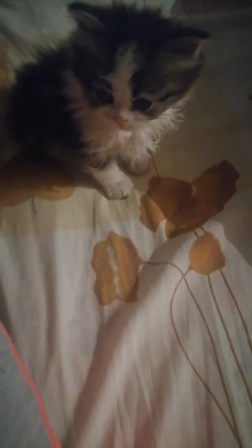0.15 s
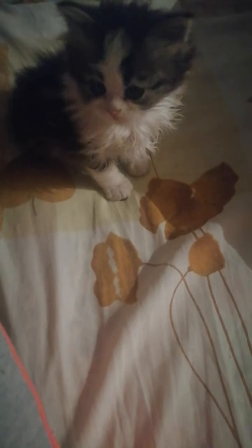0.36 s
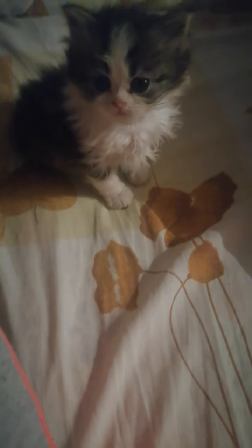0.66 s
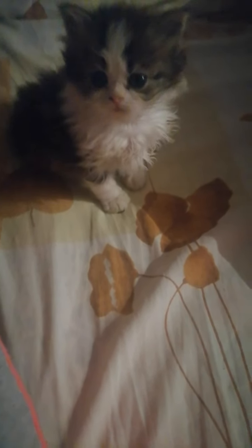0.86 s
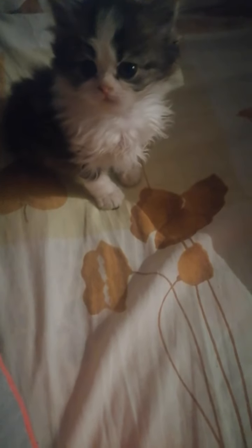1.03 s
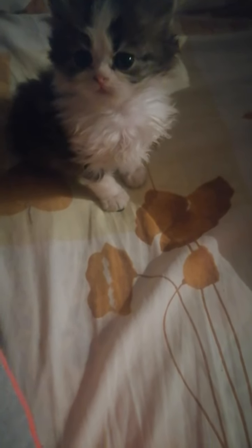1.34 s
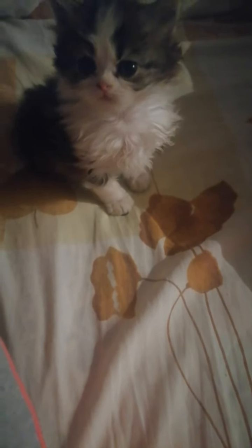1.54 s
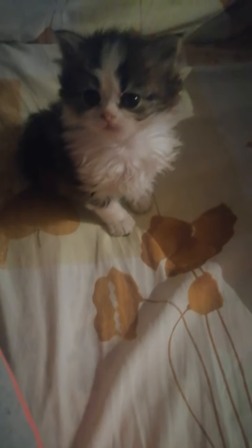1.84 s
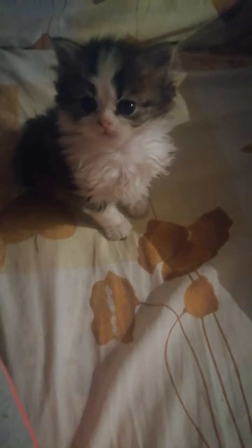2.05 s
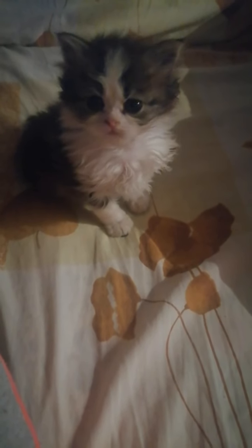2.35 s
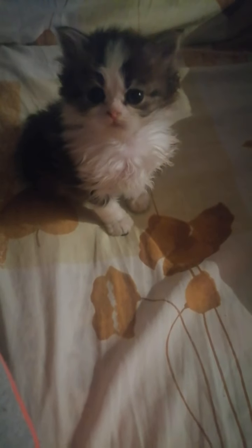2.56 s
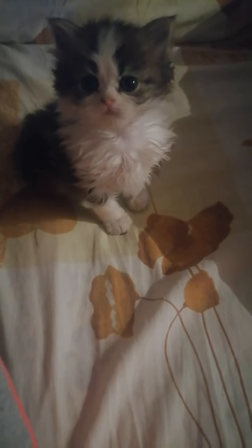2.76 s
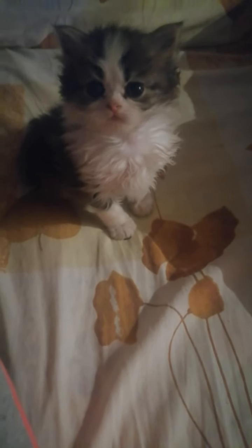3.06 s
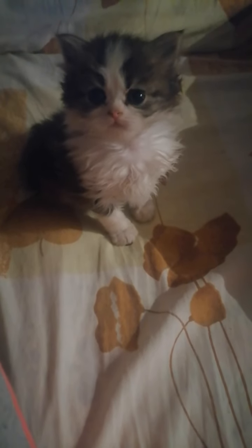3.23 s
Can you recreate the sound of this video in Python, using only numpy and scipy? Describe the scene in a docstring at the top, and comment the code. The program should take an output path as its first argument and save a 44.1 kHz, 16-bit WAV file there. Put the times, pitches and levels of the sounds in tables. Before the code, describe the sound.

A kitten meows twice, close to the microphone in a quiet room. After a tiny click at 0.2 seconds, the first high, steady-pitched meow runs from about 0.5 to 0.9 seconds, fading as the mouth closes. The second, slightly brighter and raspier, lasts from 2.0 to 2.6 seconds and lifts at its end. Faint rumble and hum lie underneath, with soft handling bumps near 1.1 and 3 seconds.

```python
"""A kitten meows twice, close by, on a bed in a quiet room.
Each meow is a clean tone from the vocal folds, rich in harmonics (multiples of its pitch). It starts
through the nose, the mouth opens, and its resonance slides down across the harmonics as it closes.
Breath adds a little rasp. The room rings briefly at the meow's pitch after the second meow. Around it
lie small ticks, rustling bedding, bumps of a hand on a phone, faint far-off tones, hum and rumble."""
import sys
import numpy as np
from scipy import signal
from scipy.fft import rfft, irfft
from scipy.io import wavfile
from scipy.ndimage import uniform_filter1d

SR = 44100
rng = np.random.default_rng(int(sys.argv[2]) if len(sys.argv) > 2 else 0)


def to_wav(s):
    """Save 16-bit WAV."""
    ch = np.atleast_2d(s).T  # columns
    pcm = np.round(np.clip(ch, -1, 1) * 32767)  # PCM
    wavfile.write(sys.argv[1], SR, pcm.astype(np.int16))


N = 149940
t = np.arange(N) / SR
FREQS_HZ = np.fft.rfftfreq(N, 1 / SR)
BACKGROUND_PAN_DB, MOUTH_WIDTH_HZ = -2.5, 255


def gain(db):
    return 10 ** (np.asarray(db) / 20)


def normalize(x):
    return x / np.sqrt(np.mean(x ** 2))


def curve(hz, points):
    """Read between (Hz, value) points, giving each octave equal room."""
    freqs, values = np.array(points, float).T
    return np.interp(np.log(np.maximum(hz, 1)), np.log(freqs), values)


def noise(colour_db):
    """Noise of strength 1, coloured by a gain for each of FREQS_HZ."""
    return normalize(irfft(rfft(rng.standard_normal(N)) * gain(colour_db), N))


def band(hz, width):
    """Noise around one pitch; width is a share of that pitch."""
    offset = (FREQS_HZ + 1) / hz - hz / (FREQS_HZ + 1)
    return noise(-20 * np.log10(1 + (offset / width) ** 2))


def wander(rate):
    """A random drift that turns rate times a second."""
    hold = max(int(SR / rate), 1)
    steps = np.repeat(rng.standard_normal(N // hold + 1), hold)
    return normalize(uniform_filter1d(steps, hold)[:N])


def swell(at, half):
    """A bell-shaped rise and fall."""
    return np.exp(-((t - at) / half) ** 2)


def bursts(rows, width):
    """Bands of noise that each swell and fade."""
    return sum(gain(db) * swell(at, half) * band(hz, width) for at, half, db, hz in rows)


def pan(db):
    """Left and right gains, the left higher by db."""
    sides = gain(np.array([db, -db]).reshape(2, -1) / 2)
    return sides / np.sqrt(np.mean(sides ** 2, axis=0))


def room():
    """Low rumble, faint hiss and a wavering hum."""
    # colour of the room's noise: frequency_hz, gain_db
    colour = [(12, -34), (20, 1.5), (59, -2.5), (106, -11), (137, -8.5), (166, -12.5), (196, -10.5),
              (225, -16), (274, -13.5), (382, -19), (427, -17.5), (505, -23.5), (631, -18.5), (811, -23.5),
              (1340, -26.5), (1450, -27), (1580, -25), (1770, -28.5), (2150, -25), (3960, -35),
              (4550, -31.5), (6190, -36.5), (6720, -36), (7730, -35.5), (15500, -47)]
    # how much left and right differ: frequency_hz, gain_db
    spread = [(30, -11.5), (250, -7), (1000, -2), (4000, 1.5), (12000, -1.5)]
    colour_db = curve(FREQS_HZ, colour)
    middle = noise(colour_db) * gain(0.46 * wander(11))
    side = irfft(rfft(noise(colour_db)) * gain(curve(FREQS_HZ, spread)), N)
    rumble = gain(-59) * np.array([middle + side, middle - side])
    hum_hz = 135 * (1 + .012 * wander(12))
    hum = np.sqrt(2) * np.sin(2 * np.pi * np.cumsum(hum_hz) / SR) * gain(-64.5 + 2 * wander(2.6))
    return pan(BACKGROUND_PAN_DB) * (rumble + hum)


def faint_tones():
    """Faint far-off tones, and the room ringing briefly at the meow's pitch after the second meow."""
    # tones: peak_s, half_length_s, level_db, pitch_hz
    tones = [(1.2, 0.12, -72, 1000), (1.242, 0.14, -68, 344.7), (1.5, 0.11, -78, 6700),
             (1.55, 0.076, -75.5, 880), (1.699, .1, -72, 737), (1.806, 0.21, -74, 1218),
             (2.708, 0.11, -66.5, 618.6), (2.902, 0.13, -68, 424), (2.996, .03, -74.5, 2220),
             (3.27, .08, -71, 753)]
    return pan(BACKGROUND_PAN_DB) * bursts(tones, width=0.026)


def room_echo(sound, level_db=-38, ring_s=0.94):
    """A furnished bedroom rings faintly, dying by 60 dB in ring_s."""
    tail = rng.standard_normal((2, N)) * np.exp(-np.log(1000) * t / ring_s)
    tail /= np.sqrt(np.sum(tail ** 2, axis=1, keepdims=True))
    return gain(level_db) * signal.fftconvolve(sound.mean(axis=0)[None], tail, axes=1)[:, :N]


def bedding():
    """Cloth rustles softly."""
    # rustles: peak_s, half_length_s, level_db
    rustles = [(1.063, 0.036, -69.5), (1.159, 0.15, -68.5)]
    # colour of the cloth: frequency_hz, gain_db
    colour = [(200, -3), (1000, -3), (3000, 8), (5500, 3), (9000, 1.5), (12000, -36)]
    cloth = np.array([noise(curve(FREQS_HZ, colour)) for _ in range(2)])
    return cloth * sum(gain(db) * swell(at, half) for at, half, db in rustles)


def hand_bumps():
    """The hand holding the phone makes soft, low bumps."""
    # bumps: peak_s, half_length_s, level_db, centre_hz
    bumps = [(.323, 0.006, -60.5, 740), (1.07, .04, -55.5, 55), (1.18, .025, -54, 58),
             (1.77, 0.074, -62.5, 54.6), (2.853, .03, -61.5, 137.4), (2.968, 0.052, -54.5, 91.5),
             (3.209, 0.044, -63, 100)]
    return pan(BACKGROUND_PAN_DB) * bursts(bumps, width=1.2)


def ticks(rise_s=.0003, decay_s=.0009):
    """Tiny wet clicks and bedding ticks die in a few milliseconds."""
    # clicks: peak_s, level_db, centre_hz, left_minus_right_db
    clicks = [(.1435, -55.5, 8500, 4), (.2175, -35.5, 7870, -11), (.228, -55.5, 8000, 2),
              (0.563, -51.5, 8000, -2), (0.58, -57.5, 8300, -2), (1.5198, -60, 4640, 6.5),
              (1.961, -57.5, 5930, -12.5), (1.973, -60, 5050, -2), (3.292, -66, 4680, -6)]
    sound = np.zeros((2, N))
    for at, db, hz, pan_db in clicks:
        shape = np.exp(-(np.minimum(t - at, 0) / rise_s) ** 2 - np.maximum(t - at, 0) / decay_s)
        sound += pan(pan_db) * gain(db) * band(hz, width=0.15) * shape
    return sound


def teeth_hiss(top_hz=10200):
    """Air hisses past the teeth."""
    # hisses: peak_s, half_length_s, level_db, centre_hz
    hisses = [(0.592, .04, -63.5, 8200), (0.681, .025, -64, 6560), (2.16, .018, -58, 8300),
              (2.27, .055, -60, 7500), (2.411, .04, -63.5, 7300)]
    return signal.sosfilt(signal.butter(8, top_hz, fs=SR, output="sos"), bursts(hisses, width=0.3))


def airway_db(hz, when, meow, voice_db=3.5, mouth_boost_db=21):
    """Throat, mouth, lips and nose boost some frequencies and weaken others."""
    # colour of voice box and throat: frequency_hz, gain_db
    throat = [(600, 0.0), (1200, -5.6), (1850, -10.9), (2450, -30.1), (3100, -24.8), (3700, -29.5),
              (4300, -30.2), (5000, -23.3), (6200, -33.2), (7400, -28.8), (8200, -39.1), (9500, -45.2),
              (10200, -53), (11000, -70)]
    # colour of shut lips: frequency_hz, gain_db
    lips = [(1400, -1), (2400, 4.5), (3100, -9), (3700, -7.5), (4400, 8), (5000, 4), (5600, -8.5),
            (6700, -3.5), (9000, -4.5)]
    # upper colour of the nose: frequency_hz, db_per_db_of_nose_dip
    nose = [(3100, 0), (3900, -0.49), (4400, -0.02), (5000, 0.13), (5600, 0.2048), (6300, -.35),
            (7400, -0.16), (8000, -0.38), (8700, 0.65), (10000, -0.5)]
    dip_hz, dip_width_hz = 1830, 414
    treble_from_hz, treble_full_hz = 920, 3000
    open_hz, shut_hz = 1700, 970  # the lips close as the mouth's resonance falls between these
    times, *columns = np.array(meow, float).T
    level, mouth_hz, bright, dip = (np.interp(when, times, column) for column in columns)
    fade = -2000 * np.maximum(0, np.maximum(times[0] - when, when - times[-1]))  # outside the meow
    offset = (hz ** 2 - mouth_hz ** 2) / (hz * MOUTH_WIDTH_HZ)
    mouth_db = 10 * np.log10(1 + gain(mouth_boost_db) ** 2 / (1 + offset ** 2))
    treble = np.clip(np.log(hz / treble_from_hz) / np.log(treble_full_hz / treble_from_hz), 0, 1)
    lips_db = np.clip((open_hz - mouth_hz) / (open_hz - shut_hz), 0, 1) * curve(hz, lips)
    nose_db = dip * (curve(hz, nose) - np.exp(-((hz - dip_hz) / dip_width_hz) ** 2))
    return voice_db + level + fade + curve(hz, throat) + mouth_db + bright * treble + lips_db + nose_db


def breath(meow, phase, bright, air_db=-20.5):
    """The vocal folds chop air into puffs, which the moving mouth shapes."""
    # colour of breath compared with the voice: frequency_hz, gain_db
    colour = [(300, -24), (700, -15.5), (1300, -16.5), (2000, -3), (2700, 5.5), (3500, 4), (4100, -2.5),
              (5000, 3.5), (7000, 6), (9000, 9), (10500, -8)]
    # brief rasps: peak_s, half_length_s, extra_air_db
    rasps = [(0.661, .011, 17), (.7, .018, 11), (2.09, .014, 13.5), (2.16, 0.01, 9), (2.243, .03, 7.5),
             (2.302, .012, 10.5), (2.38, .05, 9.5)]
    rasp_db = sum(db * swell(at, half) for at, half, db in rasps)
    puffs = rng.standard_normal(N) * (1 + .7 * np.cos(phase))
    puffs *= gain(air_db + rasp_db + .55 * np.maximum(bright, 0))
    hz, when, slices = signal.stft(puffs, SR, nperseg=256)
    hz = hz[:, None] + 1
    return signal.istft(slices * gain(airway_db(hz, when, meow) + curve(hz, colour)), SR)[1][:N]


def voice(meow, pitch, harmonics=17, jitter=0.0016, waver=0.0014, shimmer_db=0.22, lead_rad=1.3):
    """One meow: vibrating vocal folds send a tone and breath through the moving mouth."""
    pitch_hz = np.interp(t, *np.array(pitch).T) * (1 + jitter * wander(500) + waver * wander(60))
    phase = 2 * np.pi * np.cumsum(pitch_hz) / SR
    times, _, mouth_hz, bright, _ = np.array(meow, float).T
    mouth_hz, bright = np.interp(t, times, mouth_hz), np.interp(t, times, bright)
    on = (t > times[0] - .02) & (t < times[-1] + .02)
    tone = np.zeros(N)
    for k in range(1, harmonics + 1):
        hz = k * pitch_hz[on]
        flutter_db = 1.5 * min(k / 10, 1) * wander(90)[on]
        # harmonics above the mouth's resonance lag half a turn; the throat spreads high ones further
        lag = np.arctan2(hz * MOUTH_WIDTH_HZ, mouth_hz[on] ** 2 - hz ** 2)
        lag += np.pi * k * (k - 1) / harmonics
        strength = gain(airway_db(hz, t[on], meow) + flutter_db)
        tone[on] += strength * np.cos(k * phase[on] + lead_rad - lag)
    air = breath(meow, phase, bright)
    return tone * gain(shimmer_db * wander(300)) + air


def kitten():
    """Both meows reach two microphones with different colour, the right one a little later."""
    # shape of each meow: time_s, gain_db, mouth_resonance_hz, brightness_db, nose_dip_db
    first_meow = [(0.452, -68.5, 1620, -9.5, 12.5), (0.466, -36.5, 3020, -11, 14),
                  (0.48, -31, 3100, -3.5, 28), (0.525, -29, 2810, 1, 19.5), (0.58, -28, 2335, 4, 6.5),
                  (0.635, -30.5, 2085, 7.5, -0.5), (0.695, -33, 1838, 2.5, 0), (0.745, -34.5, 1400, 1.5, 0),
                  (0.795, -33.5, 1242, -2, 6), (0.84, -38, 1013, -5, 5.5), (0.905, -41, 993, -4.5, 20),
                  (0.93, -53, 873, -10, 1.5), (0.96, -75.5, 891, -6, -6)]
    second_meow = [(2.022, -72, 903, -26, 8.5), (2.04, -33, 1631, -27.5, 34.5),
                   (2.07, -27, 2860, -4.5, 7.5), (2.11, -26.5, 3280, 4.5, 17), (2.165, -27.5, 2587, 9.5, 2),
                   (2.225, -31.5, 2122, 13.5, -1.5), (2.355, -33.5, 1812, 10, 3),
                   (2.4, -34, 1497, 4.5, 1.5), (2.447, -36, 1203, -0.5, 8), (2.495, -38, 960, -0.5, 13),
                   (2.555, -42, 1053, -9.5, 16), (2.605, -58.5, 835, -19, -4.5),
                   (2.64, -78, 824, -4.5, 14.5)]
    # tune of each meow: time_s, pitch_hz
    first_pitch = [(0.46, 660), (0.47, 621), (0.518, 609.4), (0.594, 619.7), (0.728, 594.2), (0.824, 616),
                   (0.898, 619.5), (0.916, 604.3), (0.938, 617), (0.948, 657), (0.955, 659)]
    second_pitch = [(2.03, 596), (2.042, 594), (2.072, 633.8), (2.178, 624), (2.348, 591.3), (2.402, 595),
                    (2.502, 642.5), (2.556, 631.6), (2.588, 698), (2.596, 709), (2.614, 728), (2.63, 720)]
    # catches in the voice as the mouth opens and shuts: peak_s, half_length_s, level_db, centre_hz
    catches = [(.456, 0.0036, -58.5, 1190), (.461, .003, -59.5, 1900), (.471, 0.005, -49.5, 2580),
               (0.665, .007, -39, 2020), (2.051, 0.0056, -54, 1440), (2.063, .006, -46, 1970),
               (2.496, 0.0036, -51.5, 980)]
    # which side is louder: frequency_hz, left_minus_right_db
    balance = [(610, -1), (1220, -6.5), (1830, -14), (2150, -4.5), (2450, 8.5), (3100, -7.5), (3700, -10.5),
               (4300, -1.5), (4900, 9), (5500, -13.5), (6100, -23.5), (7400, -22.5), (8000, -0.5),
               (8700, 11.5), (10000, 0.5)]
    # how far the left side is ahead: frequency_hz, phase_radians
    left_lead = [(610, 0.18), (1220, 0.07), (1830, 1.09), (2450, 1.54), (3100, 1.5), (4300, 2), (5000, 2.3),
                 (6100, 3), (8000, 1.5), (10000, 2.5)]
    meows = voice(first_meow, first_pitch) + voice(second_meow, second_pitch)
    meows += bursts(catches, width=0.14) + teeth_hiss()
    right_delay = np.exp(-1j * curve(FREQS_HZ, left_lead) * np.array([[0], [1]]))
    return irfft(rfft(meows) * pan(curve(FREQS_HZ, balance)) * right_delay, N)


def scene():
    """The kitten up close; the background sinks while it is loud and then recovers."""
    sink_above_db, sink_ratio, smooth_s = -42.5, 1.4, 0.051
    near = kitten() + ticks()
    memory = np.exp(-1 / (smooth_s * SR))
    loudness = np.sqrt(signal.lfilter([1 - memory], [1, -memory], np.mean(near ** 2, axis=0)))
    sink = np.maximum(loudness / gain(sink_above_db), 1) ** (1 / sink_ratio - 1)
    return near + room_echo(near) + sink * (room() + bedding() + hand_bumps() + faint_tones())


def record(dry):
    """The phone cuts the highest treble."""
    top_hz = 15700
    return signal.sosfilt(signal.ellip(10, .1, 80, top_hz, fs=SR, output="sos"), dry)


dry = scene()
out = record(dry)
to_wav(out)
```